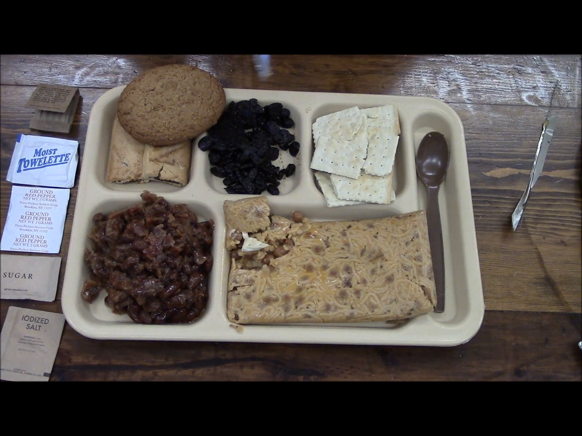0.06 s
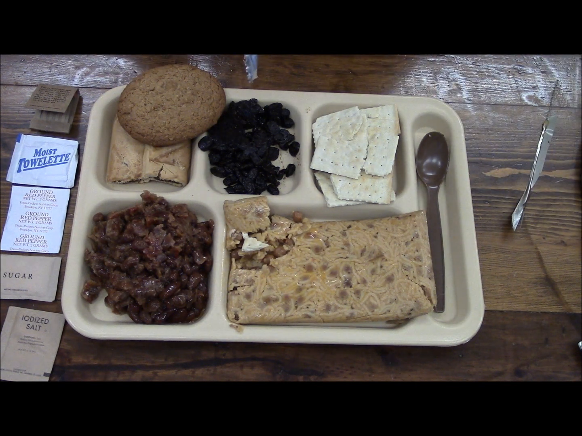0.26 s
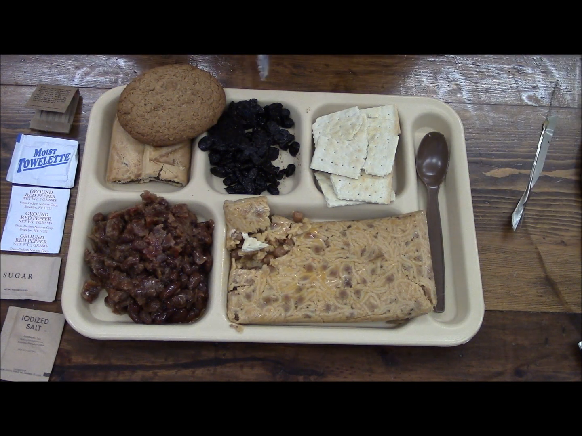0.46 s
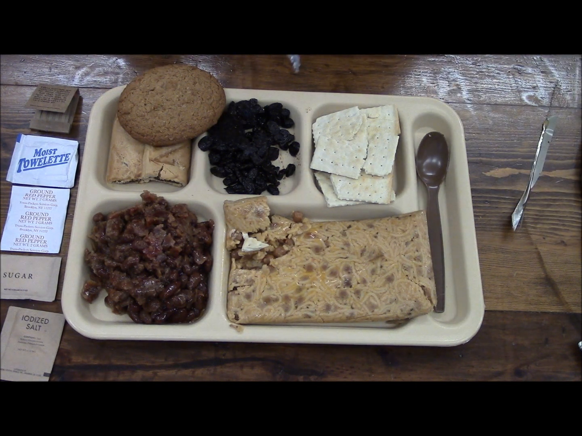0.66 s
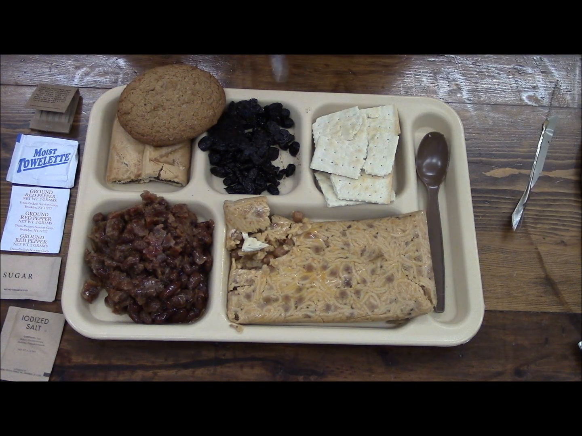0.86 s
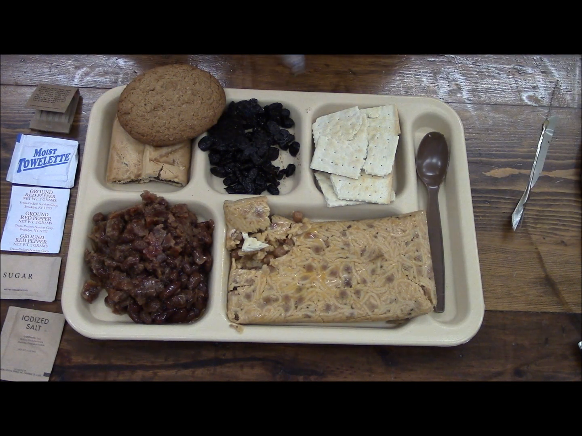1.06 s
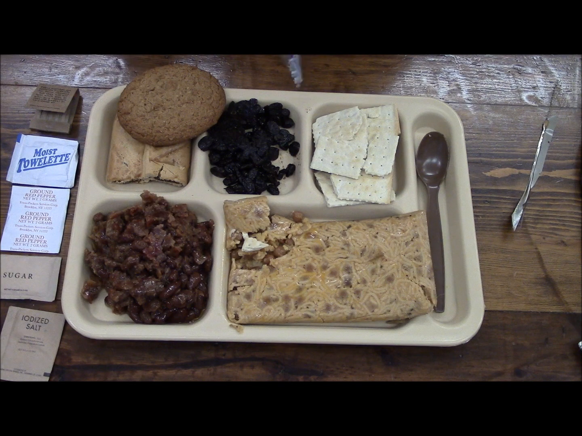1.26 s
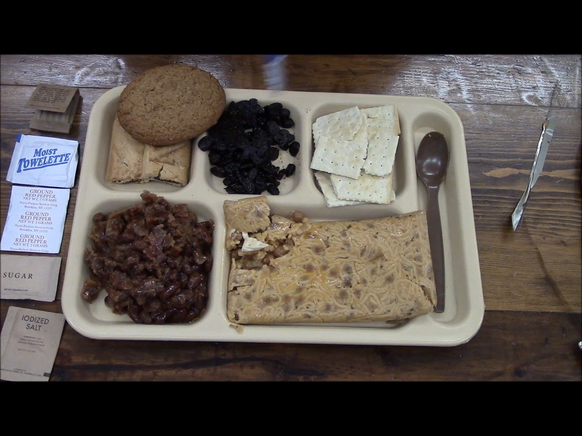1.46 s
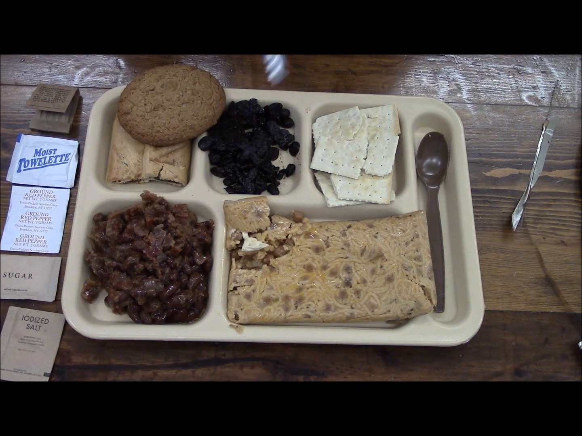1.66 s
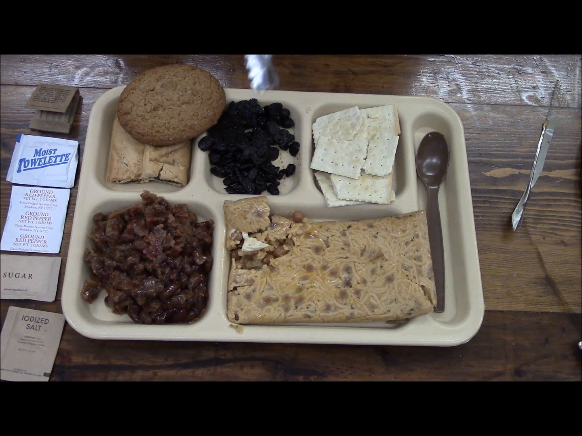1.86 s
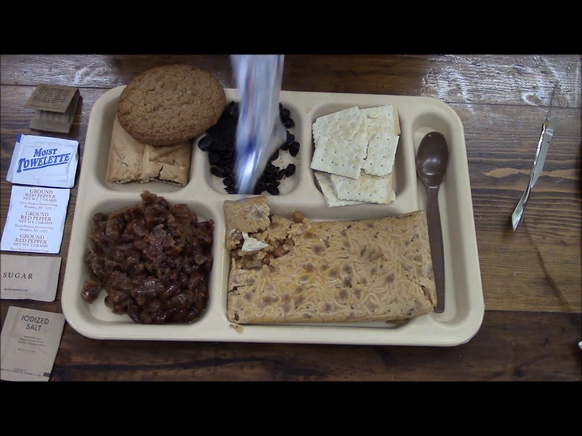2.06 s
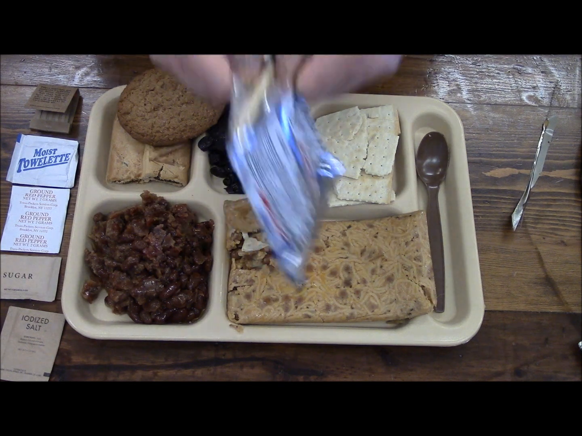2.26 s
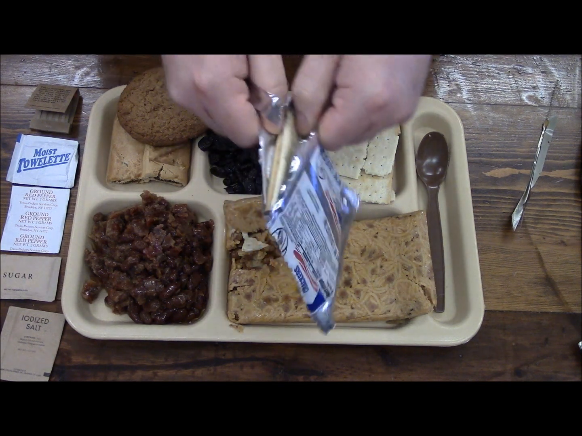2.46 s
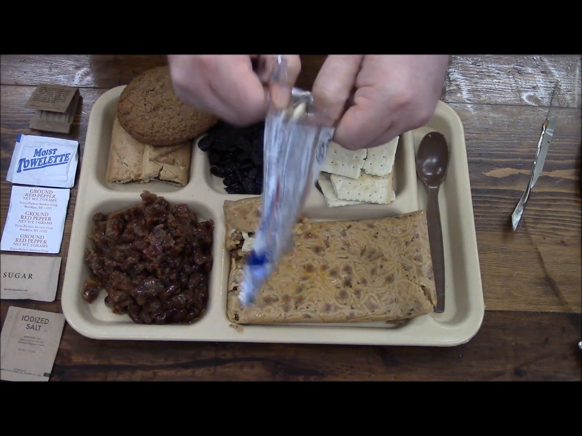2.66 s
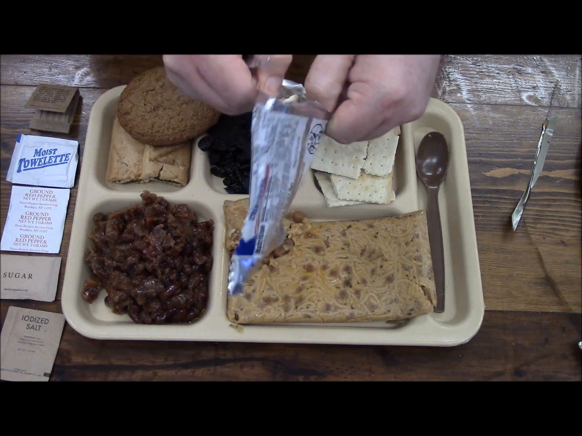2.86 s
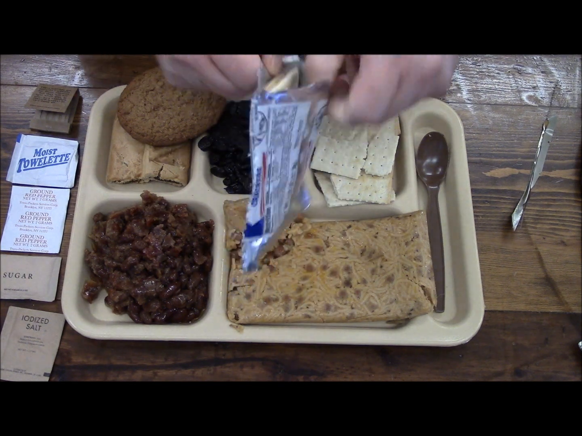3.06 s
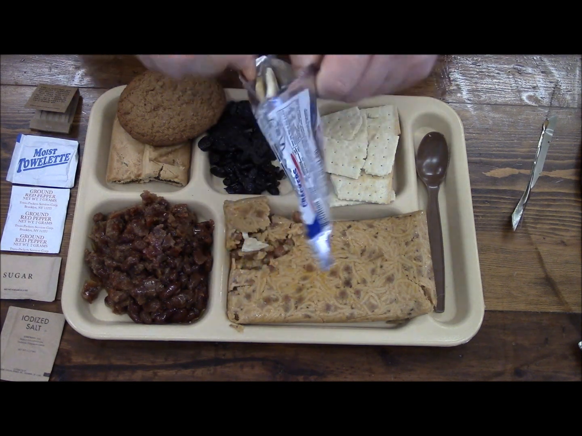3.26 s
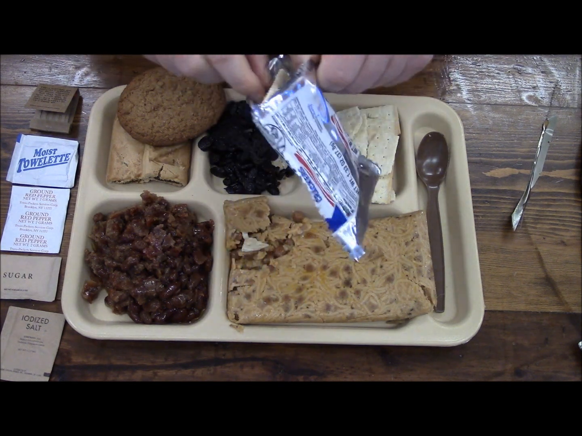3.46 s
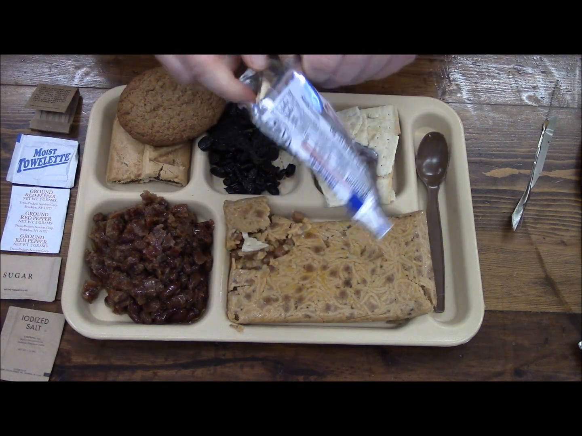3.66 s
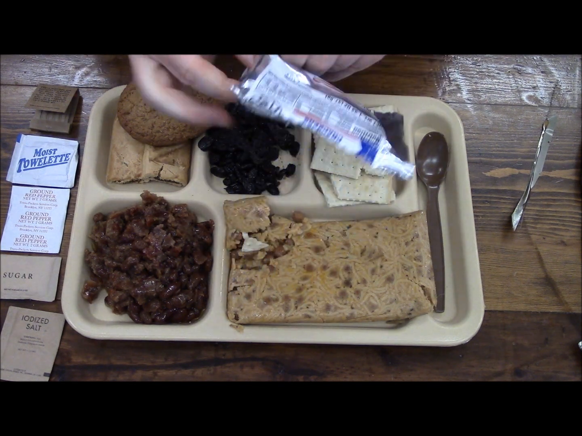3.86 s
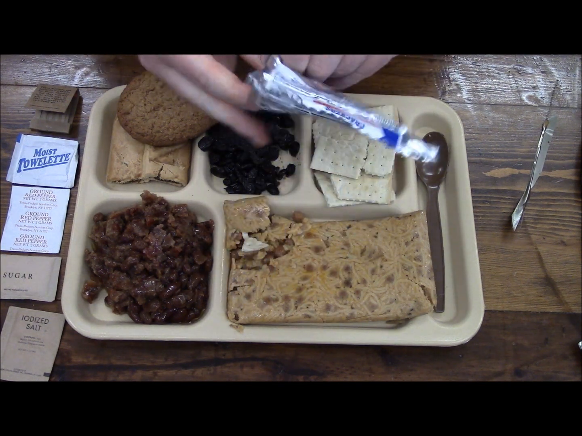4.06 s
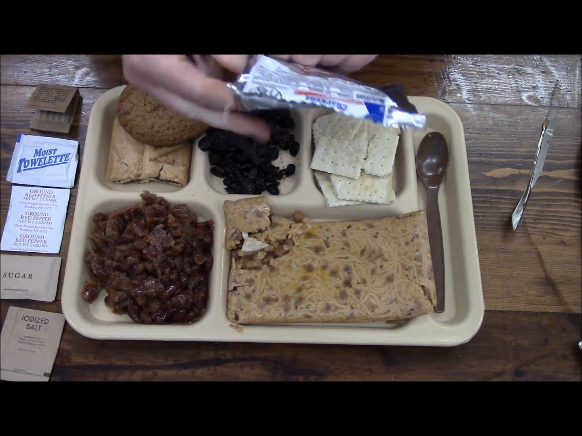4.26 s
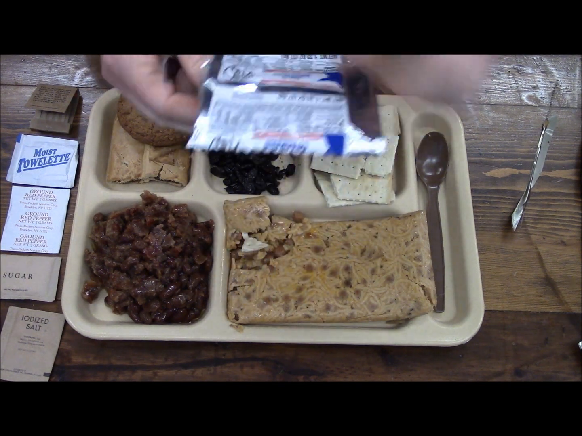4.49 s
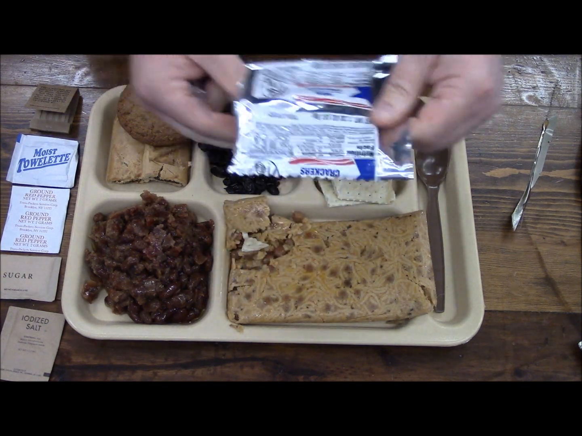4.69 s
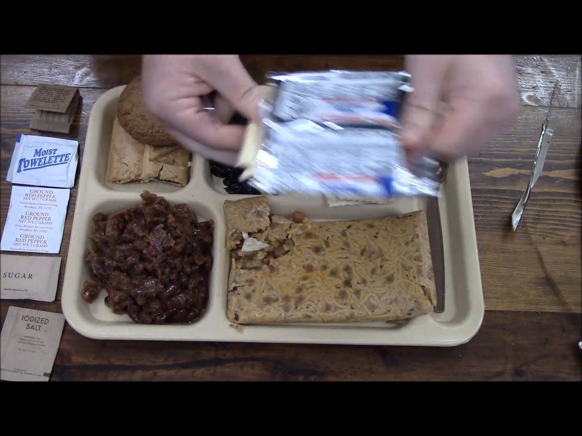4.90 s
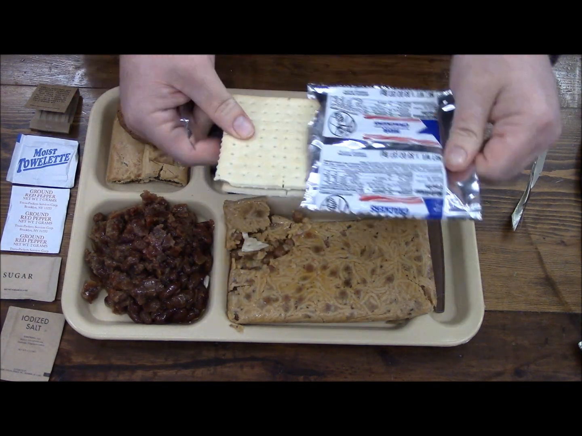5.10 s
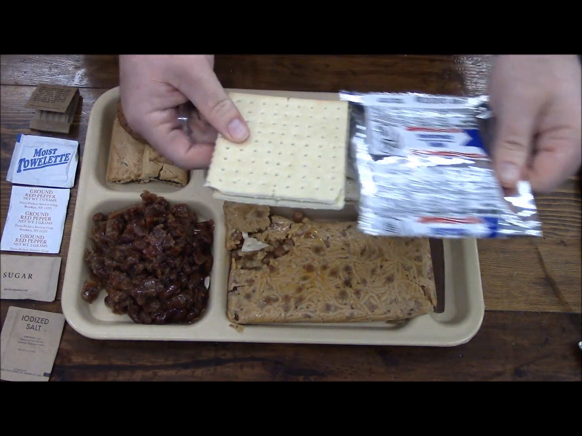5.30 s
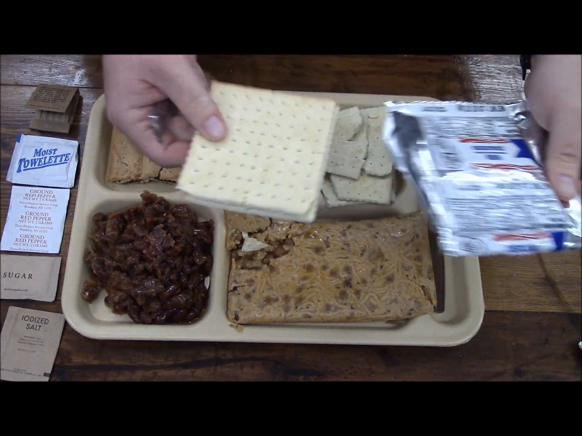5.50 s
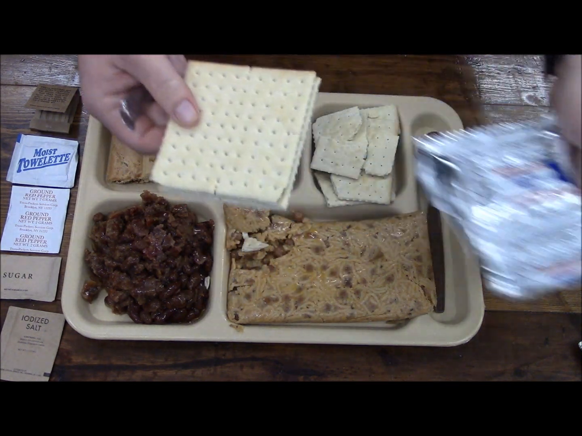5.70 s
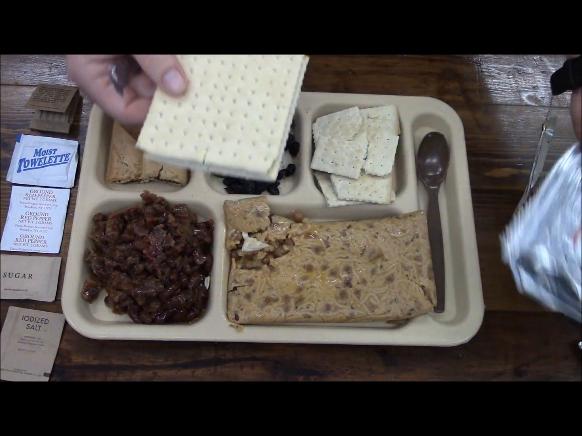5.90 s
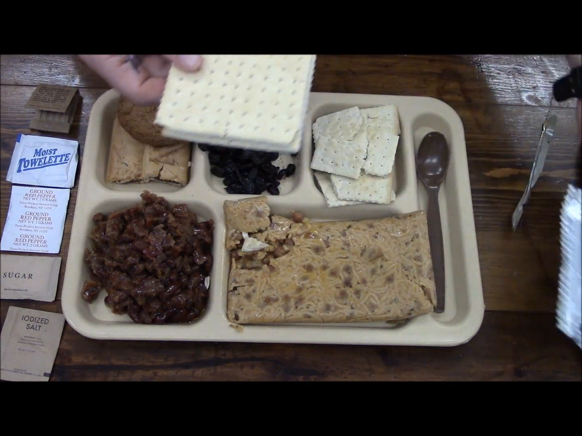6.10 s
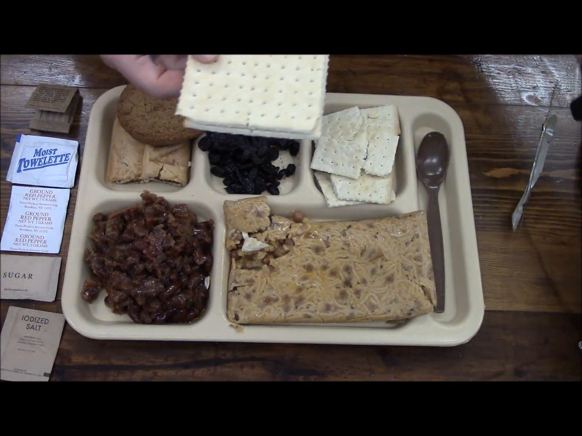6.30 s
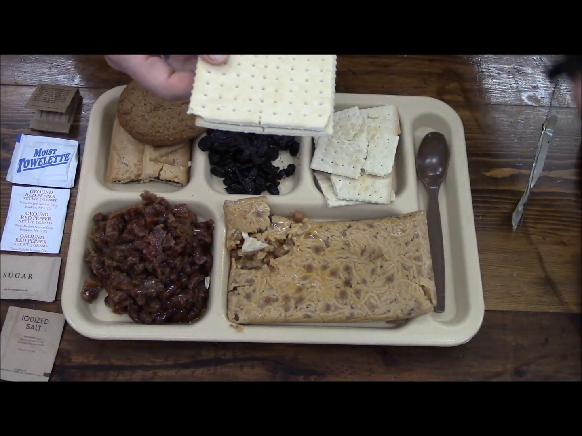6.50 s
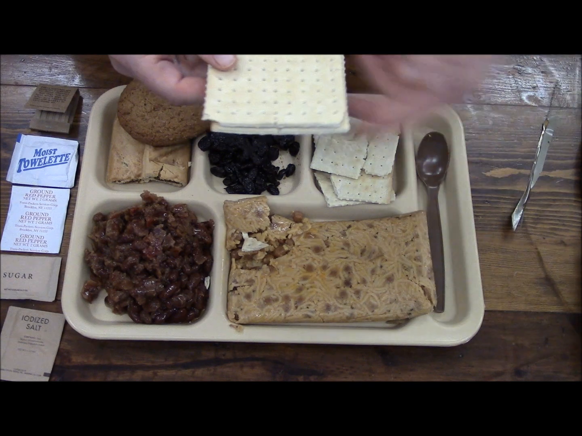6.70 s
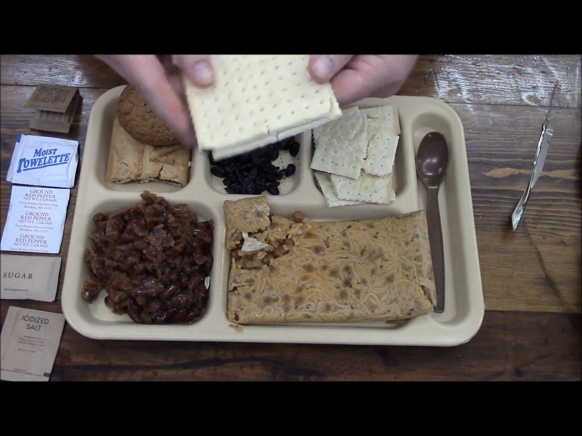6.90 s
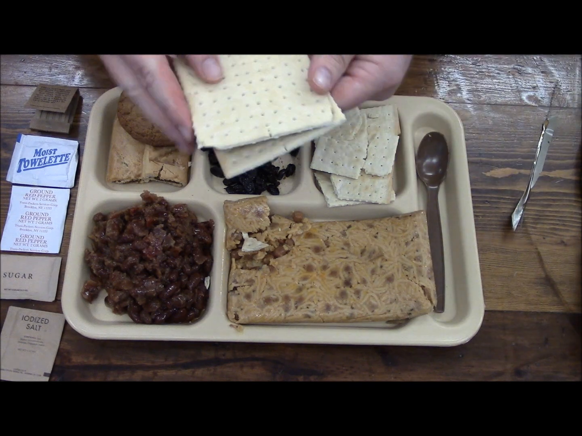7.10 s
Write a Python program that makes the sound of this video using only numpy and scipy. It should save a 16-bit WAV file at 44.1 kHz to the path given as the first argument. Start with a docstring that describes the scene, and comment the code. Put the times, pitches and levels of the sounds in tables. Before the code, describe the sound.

Close, dry crinkling of plastic-lined foil with sharp irregular snaps, a short gritty slide, and faint fading wrapper taps in a quiet small room.

```python
"""Peeling open a foil cracker packet

Film panels flip as noise spikes with short pitched ringing, and the opened pouch rings hollow behind them.
Fingers and crackers rub along the film: friction hiss broken into grit by random crease clicks. Dull low noise
knocks come alone as hands shift grip or as the low thump under a loud snap; fading ticks with a hollow note are
the empty wrapper settling on the table. Noise tails make the small room, over still air and a wavering drone.
"""
import sys
import numpy as np
from scipy import signal
from scipy.fft import rfft, irfft, next_fast_len
from scipy.io import wavfile
from scipy.ndimage import uniform_filter1d, map_coordinates

SR = 44100
rng = np.random.default_rng(int(sys.argv[2]) if len(sys.argv) > 2 else 0)


def wav_out(sig):
    """Save sig, one row per channel (or a flat mono array), as 16-bit PCM at SR to the path in sys.argv[1]."""
    wavfile.write(sys.argv[1], SR, np.round(np.clip(np.atleast_2d(sig).T, -1, 1) * 32767).astype(np.int16))


N = 315124

# Buckling snaps of the film, before band balance and panel lift:
# start_s, pitch_hz (of the panel), level_db, brightness_db_per_octave
SNAPS = [(0.045, 3460, -53, -3.5), (0.411, 4000.0, -48.5, 6), (0.451, 4850, -49.5, 0.5),
         (0.458, 2600, -44, -4.0), (0.466, 1310, -47.5, -3), (0.621, 2600, -48.5, -3),
         (0.675, 4180, -37, -1.1), (0.798, 980, -50, -5.5), (0.833, 3203.0, -51, -0.3),
         (0.843, 3300, -41, -3.5), (1.042, 2950, -55.5, -5), (1.083, 883.0, -44.5, -5),
         (1.181, 3240, -54.5, 1.5), (1.372, 860, -61.5, -13), (1.467, 3253.0, -50.5, -7),
         (1.629, 3830, -44, 2.5), (1.688, 3813, -53, 2.5), (1.775, 3170, -43, -3.1),
         (1.852, 670, -41, -5.5), (1.892, 3120, -29, -2.4), (1.898, 3500, -30.5, -1.5),
         (1.906, 3270, -28, -4.5), (2.059, 4073, -58, 9), (2.067, 3330, -45.5, -2),
         (2.087, 1110, -43.5, -7.5), (2.095, 4460, -44, 2), (2.196, 1120, -44, -8.5), (2.282, 9000, -52, 4),
         (2.521, 1250, -44.5, -5.5), (2.528, 3223, -42, -1.5), (2.549, 1050.0, -33, -4.5),
         (2.563, 2140, -29, -3.1), (2.578, 1070, -35.0, -5), (2.584, 1280, -27, -3.2),
         (2.61, 1710, -23.0, -2.0), (2.63, 1750, -40, -6.5), (2.728, 4100, -49, 2.3),
         (2.771, 1050, -45.5, 0.6), (2.801, 2800, -46, 1.3), (2.971, 3303, -43.5, -1),
         (2.986, 1620, -43, -1), (2.992, 10100, -45, 3.9), (3.018, 1760, -43, -6.5), (3.081, 8913, -66, 8),
         (3.202, 1050.0, -41.0, -2.2), (3.484, 7193.0, -55, 6.5), (3.511, 890, -48, -6),
         (3.535, 10400, -52.5, 4.5), (3.666, 1010, -34, -5.5), (3.703, 973.0, -46, 0.5),
         (3.806, 3003, -35.5, -8), (3.808, 3530, -26.5, 2), (3.81, 3380, -23, -3.5),
         (4.091, 3660, -46.5, 4.2), (4.106, 3113.0, -33, -1), (4.129, 3200, -42, -5.0),
         (4.136, 3150.0, -35.5, -0.6), (4.191, 530, -49, -5.5), (4.236, 4160, -50.5, 3),
         (4.244, 4120, -48, -4), (4.284, 3003, -56, 5.5), (4.351, 2900, -43, 4.5), (4.372, 9700, -35.5, 1),
         (4.622, 960, -44, 2.8), (4.68, 2880, -32.5, -0.9), (4.715, 5160.0, -40, 2.1),
         (4.744, 2773, -44, -3), (4.8, 3213.0, -46.5, 2.5), (4.853, 7100, -49, 10.5), (4.924, 5903, -39, 3),
         (4.946, 3600, -35.5, -6.5), (5.029, 8003, -54, 1), (5.071, 7100, -44.5, 2.9),
         (5.189, 9100.0, -44.5, 8), (5.234, 3240, -45.5, 4), (5.24, 2100, -42.5, 4.7),
         (5.265, 4063, -50.5, -3.5), (5.31, 3500.0, -45, 0.5), (6.289, 3123.0, -51.5, 0.7),
         (6.331, 3200, -38.5, 1.5), (6.335, 3480, -38.5, -4.5), (6.368, 2843.0, -57.5, 10.5),
         (6.442, 6850, -37, 1), (6.715, 3460, -47.5, -3), (7.006, 3243.0, -54.5, 4.5)]
# Thud, body, bite and sizzle of a snap: from_hz, to_hz
SNAP_BANDS = [(290, 722), (700, 2580), (2400, 5300), (6000, 11100)]
# Base ring time of each snap band, scaled by the panel's life: t60_s
SNAP_T60 = [0.016, 0.021, 0.02, 0.017]
# Band balance shared by all snaps: level_db
SNAP_BALANCE = [-10, 0, 0, -6]
PANEL_LIFT_DB, PANEL_REACH_OCTAVES = 5, 1.0  # a snap is strongest near its panel's pitch
PIVOT_HZ = 2000  # brightness tilts a sound around this pitch
CAVITY_WIDTH_HZ = 280  # half width of the pouch's hollow ring behind a snap

# Strokes of fingers and crackers along the film, before band balance:
# start_s, length_s, level_db, brightness_db_per_octave
STROKES = [(0.32, 0.013, -53.5, -0.5), (0.465, 0.073, -53, -.7), (0.842, 0.025, -41, 0.5),
           (1.084, 0.015, -52.5, -5), (1.182, 0.011, -52.5, 2.5), (1.24, .012, -53.5, 2),
           (2.054, 0.038, -48, 1), (2.401, 0.02, -54, 0.5), (2.509, 0.018, -47, -1),
           (2.57, 0.06, -39, -2.5), (2.976, 0.052, -41.5, -0.5), (3.168, 0.0068, -47.5, 3),
           (3.301, 0.0073, -47.5, -0.5), (3.363, 0.004, -46, 1), (3.484, 0.037, -52, -1.5),
           (3.629, 0.015, -52.5, -2.3), (4.087, 0.039, -47, -3.9), (4.337, 0.021, -39, 0.8),
           (4.576, 0.053, -45.5, -1), (4.666, 0.046, -45.5, -1.5), (4.795, 0.031, -45, 3),
           (4.87, 0.083, -32.5, 1.44), (5.102, 0.075, -43.5, .7), (5.187, 0.055, -40.5, -0.5),
           (5.632, 0.018, -55.5, -0.5), (5.947, 0.015, -63, -1.5), (6.341, 0.02, -40, -2.5),
           (6.408, 0.058, -45, 0), (6.486, 0.079, -49.5, -0.2), (6.799, 0.011, -57.5, 5),
           (7.044, 0.027, -64, 3)]
# Faint rustle of the held packet, before band balance: time_s, level_db, brightness_db_per_octave
HANDLING = [(0, -62, -0.5), (.22, -58, 0.2), (.62, -65.5, -0.5), (.92, -51, -1.1), (1.05, -59.5, 0.3),
            (1.8, -52, -0.23), (2.27, -54, 1.8), (2.47, -61, -1.7), (2.72, -54.5, 0.5), (2.86, -59, 0.5),
            (3.2, -58, -0.5), (3.58, -63, 0.5), (4.28, -51.5, -2.5), (4.5, -60, 0.1), (5.28, -56.5, -2.5),
            (5.42, -62.5, -1.7), (5.8, -66.5, 0.5), (6.199, -77.5, 5), (7.101, -75, 5.5)]
# Scuff, rustle, rasp and fine crackle of the rubbing: from_hz, to_hz
RUB_BANDS = [(130, 700), (700, 2400), (2400, 6000), (6000, 17000)]
# Band balance shared by all rubbing: level_db
RUB_BALANCE = [-7, -4, -3, -8.5]
# Colour of the rubbed film: pitch_hz, gain_db
FILM_COLOUR = [(100, -7.5), (200, -6.5), (320, 7.5), (550, 6), (1000, 4.5), (1700, 4.5), (2300, 0.5),
               (3300, 7.5), (5000, 2.5), (7000, 0), (10000, -2), (13000, -2.5), (16000, -13.5)]
# Resonances of the half-empty packet, relative to each other: pitch_hz, width_hz, gain_db
POUCH_MODES = [(650, 33, 0.5), (1030, 340, 5), (1560, 200, -2.5), (3370, 2200, 6), (9400, 840, -19)]
ATTACK_S, RELEASE_S = 0.0077, 0.019  # base times for a stroke to swell and fade by 20 dB
EASE = 0.56  # longer strokes start and stop more gently (s added per s of length)
TILT_FROM_HZ = 680  # the tilt of the rubbing levels off below this pitch
PACKING_DB, PACKING_SPAN_DB = -51, 5  # crackle level where creases crowd, and the rise until fully packed
LIGHT_TOUCH_DB, FIRM_TOUCH_DB = -86.5, -49.5  # rustle level of a touch that only hisses, and of full grit
SLIDE_BLUR = 0.26  # share of the grit that hard sliding smears into an even rasp

# The empty wrapper rocks on the table, before band balance: start_s, level_db
ROCKING = [(6.41, -30), (6.446, -30), (6.505, -36), (6.53, -39), (6.566, -41), (6.597, -43.5)]
# Thud, body, bite and sizzle of each of these contacts: level_db
ROCK_BALANCE = [-23, -1.5, -8, -18]
ROCK_HZ, ROCK_RING_DB = 1596, -2.5  # note of the empty pouch, and how strongly a contact rings it

# Dull low knocks, some from a shifting grip, some the low thump under a loud snap:
# start_s, level_db, pitch_hz, length_s (twice the swell time)
KNOCKS = [(0.323, -58, 302, 0.051), (.505, -56.5, 228, 0.073), (3.167, -44.5, 318, 0.035),
          (3.27, -58, 190, 0.035), (3.463, -45, 230, 0.02), (3.735, -50, 202, 0.025),
          (3.803, -30.5, 370, 0.0092), (4.134, -30.5, 700, 0.0093), (6.038, -59.5, 227, 0.026),
          (6.33, -56.5, 151, 0.032), (6.442, -57.5, 160, 0.054), (6.992, -59, 376, 0.038)]
# Decay of the room tail: pitch_hz, t60_s
ROOM_DECAY = [(150, 0.23), (500, 0.17), (1600, 0.23), (4000, 0.15), (12000, 0.11)]
# Colour of the still air: pitch_hz, gain_db
AIR_COLOUR = [(25, -18), (45, -3.5), (100, 1), (200, 7), (400, 7), (900, -0.5), (1800, -4.5), (3200, -10),
              (5500, -15.5), (10000, -25.5), (16000, -31.5)]
# Low drone, before its waver: time_s, level_db
DRONE_LEVEL = [(0, -77), (1.2, -78.5), (2.7, -75.5), (4.1, -71.5), (5.2, -74.5), (7.1, -75)]
# Lean of the whole stereo image: time_s, left_minus_right_db
LEAN = [(3.3, -.1), (3.8, -.7), (4.2, 0), (5.3, -.1), (6.4, -1), (7, -.4)]
TOP_HZ = 15800  # band limit


def snaps():
    """Each loud buckle shares one colour, tilted by brightness and lifted near its panel's pitch."""
    out = np.zeros(N + SR)
    for start_s, panel_hz, level_db, brightness in SNAPS:
        distance = octaves(SNAP_BANDS, panel_hz) / PANEL_REACH_OCTAVES
        lift_db = PANEL_LIFT_DB * np.exp(-distance ** 2)
        tilt_db = brightness * octaves(SNAP_BANDS, PIVOT_HZ)
        band_db = level_db + np.array(SNAP_BALANCE) + tilt_db + lift_db
        crack = snap(band_db, panel_hz, ring_db=11.5, ring_q=8.0, rise_s=0.00024, shrink=0.17)
        ring = hollow(panel_hz, cavity_hz=1700, width_hz=CAVITY_WIDTH_HZ, t60=0.12)
        place(out, start_s, crack)
        place(out, start_s, amp(band_db[1] - 5) * ring)  # follows the body band
    return out[:N]


def snap(band_db, panel_hz, ring_db, ring_q, rise_s, shrink, spike_db=3, spike_t60=0.0024):
    """A panel flips over: a sharp noise spike, then a short ringing at the panel's pitch."""
    t = np.arange(SR // 20) / SR
    life = (panel_hz / 2000) ** -shrink  # small, high panels settle sooner
    damping = 1 / (1 + (panel_hz / 2500) ** 2)  # the plastic layer soaks up high notes
    out = np.zeros(len(t))
    for (lo, hi), t60, db in zip(SNAP_BANDS, SNAP_T60, band_db):
        fall = amp(-60 * t / (t60 * life)) + amp(spike_db - 60 * t / spike_t60)
        burst = rng.standard_normal(len(t)) * fall * (1 - np.exp(-t / rise_s))
        panel = resonate(burst, panel_hz, ring_q * life)
        ring = burst + amp(ring_db) * damping * panel
        ring = band(ring, lo, hi, order=2 if lo < 400 else 3)
        out += amp(db) * unit(ring) / np.sqrt(10)  # levels are set as if a tenth of the span held it all
    return out


def hollow(panel_hz, cavity_hz, width_hz, t60):
    """Air in the opened pouch rings on, the more the nearer the panel's pitch is to its own."""
    t = np.arange(SR // 5) / SR
    drive = 1 / np.sqrt(1 + ((panel_hz - cavity_hz) / width_hz) ** 4)
    noise = rng.standard_normal(len(t))
    ring = unit(band(noise, cavity_hz - width_hz, cavity_hz + width_hz, order=2))
    return drive * ring * amp(-60 * t / t60) * (1 - np.exp(-t / 0.0021))


def rubbing(grit):
    """Creases crackle over a smooth friction hiss; hard sliding packs them into a dense rasp."""
    band_db = friction()
    sliding = np.clip((band_db[-1] - PACKING_DB) / PACKING_SPAN_DB, 0, 1)
    loose = creases(230, spread_db=5, clump_db=4, t60=0.008)
    packed = creases(650, spread_db=4.6, clump_db=4, t60=0.005)
    crackle = (1 - sliding) * loose + sliding * packed
    touch = np.clip((band_db[1] - LIGHT_TOUCH_DB) / (FIRM_TOUCH_DB - LIGHT_TOUCH_DB), 0, 1)
    share = np.clip(grit * touch * (1 - SLIDE_BLUR * sliding), 0, 1)  # pressure turns hiss into grit
    force = np.sqrt(share * crackle + 1 - share)
    noise = filtered(rng.standard_normal(N) * force, lambda hz: amp(along(FILM_COLOUR, hz)))
    noise = noise + amp(0.5) * pouch(noise)
    return sum(amp(db) * unit(band(noise, lo, hi)) for db, (lo, hi) in zip(band_db, RUB_BANDS))


def friction():
    """Level of each rubbing band (dB): strokes swell, hold and fade on top of the faint handling."""
    t = np.arange(N) / SR
    time_s, *columns = np.transpose(HANDLING)
    held_db, held_brightness = [np.interp(t, time_s, c) for c in columns]
    height = np.maximum(octaves(RUB_BANDS, PIVOT_HZ), np.log2(TILT_FROM_HZ / PIVOT_HZ))[:, None]
    power = amp(held_db + held_brightness * height) ** 2
    for start_s, length_s, level_db, brightness in STROKES:
        end_s = start_s + length_s
        near = slice(*np.searchsorted(t, [start_s - 0.5, end_s + 0.5]))
        swell = np.maximum(start_s - t[near], 0) / (ATTACK_S + EASE * length_s)
        fade = np.maximum(t[near] - start_s - length_s, 0) / (RELEASE_S + EASE * length_s)
        power[:, near] += amp(level_db + brightness * height - 20 * (swell + fade)) ** 2
    return 10 * np.log10(power) + np.array(RUB_BALANCE)[:, None]


def creases(rate, spread_db, clump_db, t60):
    """Tiny creases give way at random, in clumps: their power over time, about 1 on average."""
    chance = rate / SR * amp(clump_db * wobble(60))
    size = amp(spread_db * np.minimum(rng.exponential(size=N), 2.8))
    clicks = (rng.random(N) < chance) * size ** 2
    t = np.arange(SR // 100) / SR
    power = np.abs(signal.fftconvolve(clicks, amp(-60 * t / t60) ** 2)[:N])
    return power / (np.abs(uniform_filter1d(power, SR // 16)) + 1e-9)


def pouch(x):
    """The half-empty packet rings as a handful of parallel damped resonances."""
    return sum(amp(db) * resonate(x, hz, hz / width) for hz, width, db in POUCH_MODES)


def rocking():
    """The wrapper is put down: fading contacts, each a tick and the same hollow note."""
    out = np.zeros(N + SR)
    for start_s, level_db in ROCKING:
        band_db = level_db + np.array(ROCK_BALANCE)
        tick = snap(band_db, ROCK_HZ, ring_db=16.5, ring_q=9, rise_s=0.0002, shrink=0)
        ring = hollow(ROCK_HZ, cavity_hz=ROCK_HZ, width_hz=150, t60=0.062)
        place(out, start_s, tick)
        place(out, start_s, amp(level_db + ROCK_RING_DB) * ring)
    return out[:N]


def knocks():
    """A shifting grip or the low thump under a loud snap: narrow-band noise that swells and dies away."""
    out, t = np.zeros(N + SR), np.arange(SR // 5) / SR
    for start_s, level_db, pitch_hz, length_s in KNOCKS:
        u = 2 * t / length_s
        noise = band(rng.standard_normal(len(t)), pitch_hz * 0.8, pitch_hz * 1.27, order=2)
        place(out, start_s, amp(level_db) * unit(noise) * u * np.exp(1 - u))
    return out[:N]


def room(x, delay_s=0.004, count=24):
    """Table and near walls answer with decaying noise, a new tail for each stretch of the scene."""
    out, step = np.zeros(N + SR), N // count + 1
    for start in range(0, N, step):
        hz, t, z = signal.stft(rng.standard_normal(SR // 3), SR, nperseg=256)
        decay = amp(-60 * t / along(ROOM_DECAY, hz)[:, None])
        tail = signal.istft(z * decay, SR, nperseg=256)[1]
        early = amp(-1.5 - 60 * np.arange(len(tail)) / SR / 0.36)  # close surfaces crowd the start
        tail = tail * (1 + early)
        wet = signal.fftconvolve(x[start:start + step], tail / np.linalg.norm(tail))
        out[start + round(delay_s * SR):][:len(wet)] += wet
    return out[:N]


def background(hum_hz):
    """Coloured noise for still air and a wavering sine for an appliance's drone, as mid and side."""
    air = unit(filtered(rng.standard_normal((2, N)), lambda hz: amp(along(AIR_COLOUR, hz))))
    level_db = np.interp(np.arange(N) / SR, *np.transpose(DRONE_LEVEL)) + 1.8 * wobble(7.7)
    phase = 2 * np.pi * np.cumsum(hum_hz + 3.0 * wobble(10)) / SR
    drone = amp(level_db) * unit(np.sin(phase))
    return amp(-62.5) * air[0] + drone, amp(-70.5) * air[1]


def amp(db):
    """Decibels to gain."""
    return 10 ** (np.asarray(db) / 20)


def unit(x):
    """Scale to rms 1."""
    return x / np.sqrt(np.mean(x ** 2) + 1e-20)


def place(out, start_s, sound):
    """Mix a sound into out at its start time."""
    out[round(start_s * SR):][:len(sound)] += sound


def along(points, hz):
    """Read (Hz, value) points on a log frequency axis."""
    f, v = np.transpose(points)
    return np.interp(np.log(hz + 1), np.log(f), v)


def octaves(bands, hz):
    """How far the middle of each band lies above hz, in octaves."""
    return np.log2(np.sqrt(np.prod(bands, axis=1)) / hz)


def wobble(rate):
    """A smooth random curve, rate knots a second."""
    knots = rng.standard_normal(int(N * rate / SR) + 4)
    return map_coordinates(knots, [np.arange(N) * rate / SR])


def filtered(x, response):
    """Shape x by a gain curve over frequency."""
    m = next_fast_len(N + SR // 2)
    return irfft(rfft(x, m) * response(np.fft.rfftfreq(m, 1 / SR)), m)[..., :N]


def band(x, lo_hz, hi_hz, order=3):
    """Causal band-pass."""
    edges = [lo_hz, min(hi_hz, SR / 2 - 1)]
    return signal.sosfilt(signal.butter(order, edges, "bandpass", fs=SR, output="sos"), x)


def resonate(x, hz, q):
    """One damped resonance, gain 1 at its peak."""
    return signal.lfilter(*signal.iirpeak(hz, max(q, 1), SR), x)


def scene():
    """The packet stays close to the middle; room and still air give a little width."""
    packet = snaps() + rocking() + rubbing(grit=0.75) + knocks()
    mid, side = background(hum_hz=67.0)
    mid = mid + packet + amp(-12.0) * room(packet)
    low_end = amp(8.5) * band(packet, 67, 254)  # the side answer is fuller in the lows
    side = side + amp(-31.5) * room(packet + low_end)
    lean_db = np.interp(np.arange(N) / SR, *np.transpose(LEAN))
    return np.array([mid + side, mid - side]) * amp([lean_db / 2, -lean_db / 2])


def record(dry):
    """A very steep low-pass closes the top end at the band limit."""
    return filtered(dry, lambda hz: 1 / np.sqrt(1 + (hz / TOP_HZ) ** 120))


dry = scene()
out = record(dry)
wav_out(out)
```